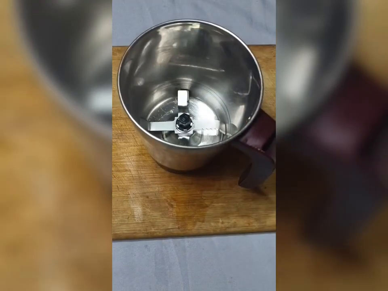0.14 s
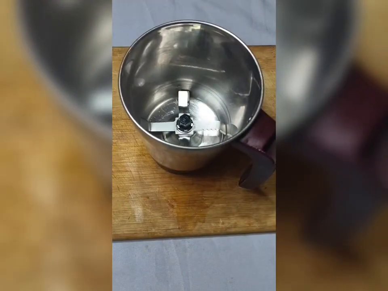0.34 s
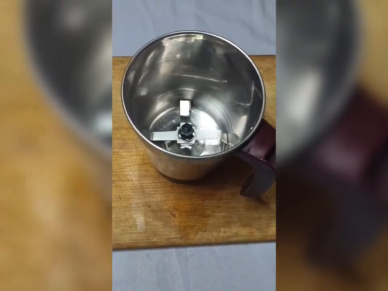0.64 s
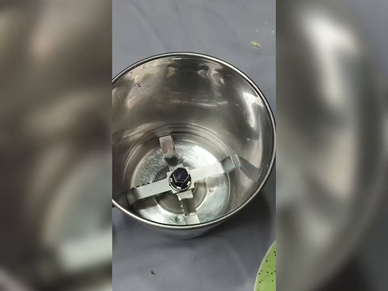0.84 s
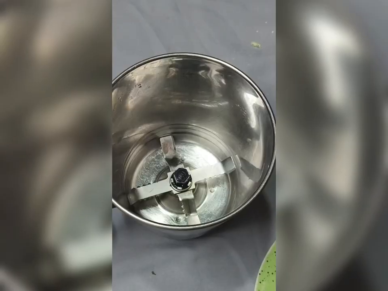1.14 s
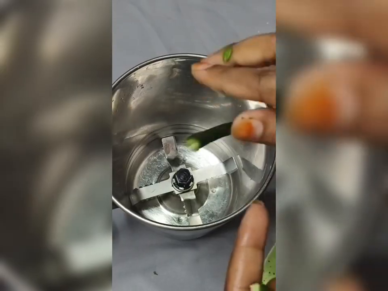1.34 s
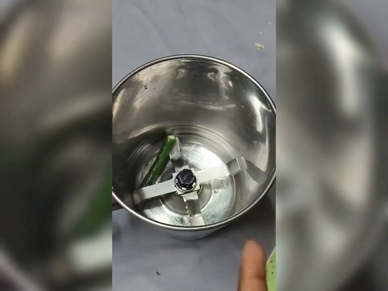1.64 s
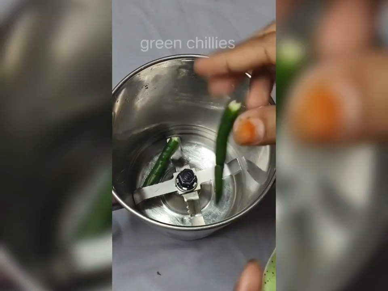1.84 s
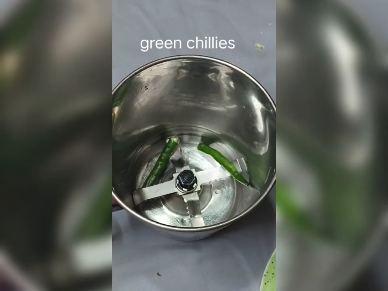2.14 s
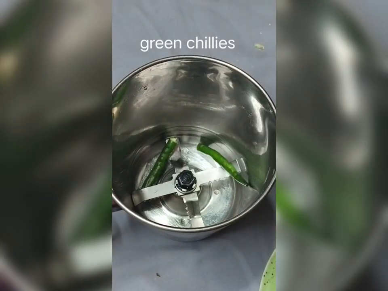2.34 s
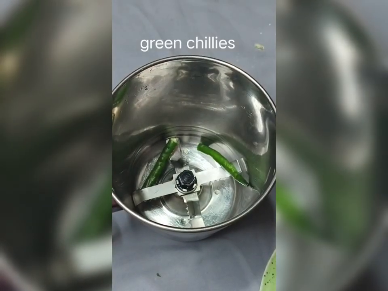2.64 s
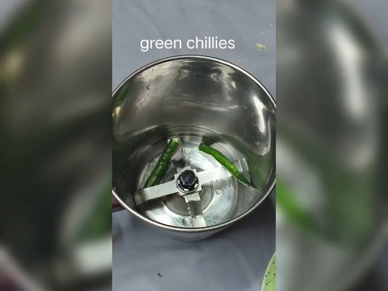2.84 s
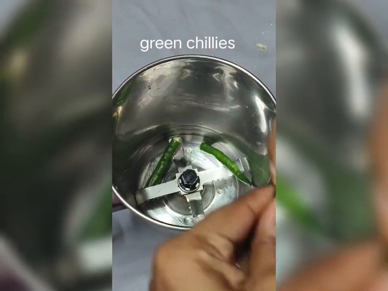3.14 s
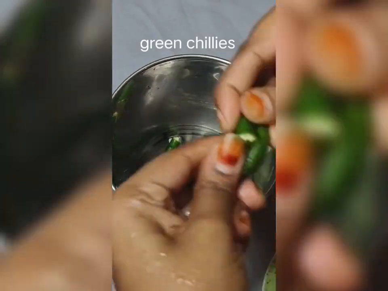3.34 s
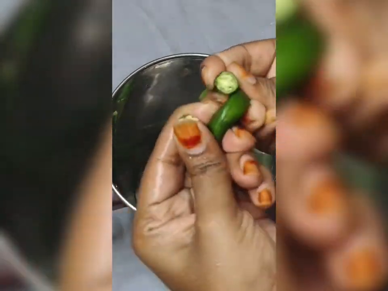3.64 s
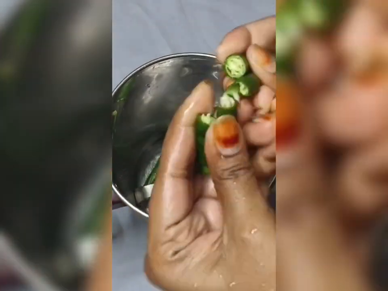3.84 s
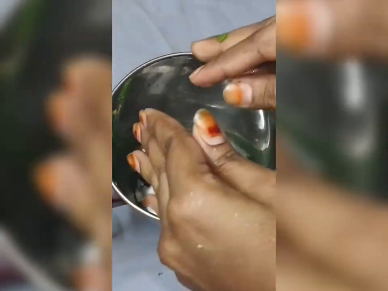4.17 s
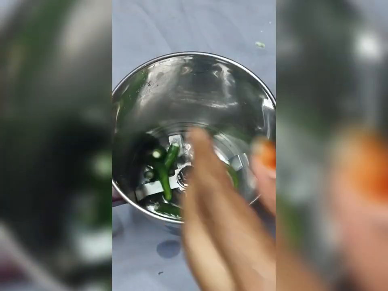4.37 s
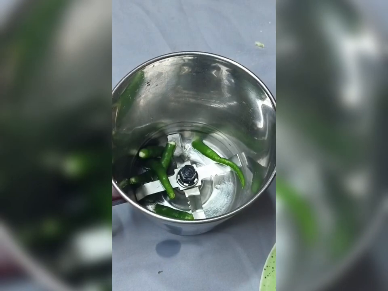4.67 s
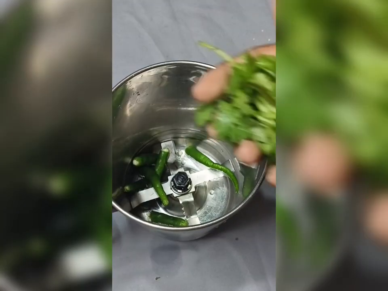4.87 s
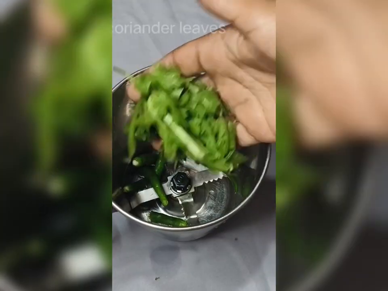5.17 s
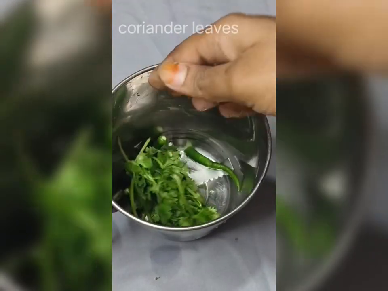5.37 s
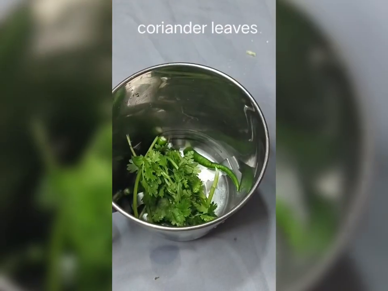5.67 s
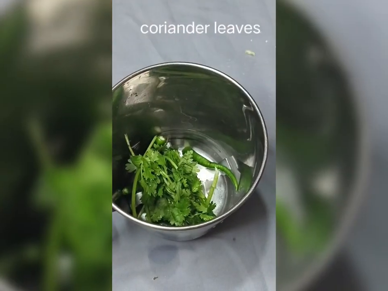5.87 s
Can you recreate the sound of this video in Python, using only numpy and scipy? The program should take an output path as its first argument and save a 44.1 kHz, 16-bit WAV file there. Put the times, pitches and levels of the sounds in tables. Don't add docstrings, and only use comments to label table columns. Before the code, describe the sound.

A metal jar knocks onto a wooden board and rocks, then chillies clatter into it, crack sharply when snapped, and leaves drop softly over faint hiss.

```python
import sys
import numpy as np
from scipy import signal
from scipy.fft import rfft, irfft, next_fast_len
from scipy.io import wavfile
from scipy.ndimage import uniform_filter1d, map_coordinates

SR = 44100
rng = np.random.default_rng(int(sys.argv[2]) if len(sys.argv) > 2 else 0)


def inscribe(sig):
    pcm = np.round(np.clip(np.atleast_2d(sig).T, -1, 1) * 32767)
    wavfile.write(sys.argv[1], SR, pcm.astype(np.int16))


def makeup_ratio(level_db):
    decades = np.asarray(level_db, float) / 20
    return 10 ** decades


N = 264801

# (start [s], end [s], fade-in [s])
SHOTS = [
    (-1, .949, .002),
    (.991, 4.812, .007),
    (5.03, 7, .015),
]


def unit(x):
    return x / np.sqrt(np.mean(x ** 2) + 1e-20)


def along(f, v, hz):
    return np.interp(np.log(hz + 1), np.log(np.asarray(f) + 1), v)


def power_sum(*levels_db):
    return np.sqrt(sum(makeup_ratio(db) ** 2 for db in levels_db))


def wobble(rate_hz):
    knots = rng.standard_normal(int(N * rate_hz / SR) + 4)
    return map_coordinates(knots, [np.arange(N) * rate_hz / SR])


def filtered(x, response):
    m = next_fast_len(x.shape[-1] + 8192)
    return irfft(rfft(x, m) * response(np.fft.rfftfreq(m, 1 / SR)), m)[..., :x.shape[-1]]


def add(track, s, x):
    at = round(s * SR)
    x = x[..., max(-at, 0):N - at]
    track[:, max(at, 0):max(at, 0) + x.shape[-1]] += x


def rush(spectrum, patchy_db):
    z = signal.stft(rng.standard_normal((2, N)), nperseg=512)[2]
    field = uniform_filter1d(rng.standard_normal(z.shape[1:]), size=5, axis=0)
    field = uniform_filter1d(field, size=10, axis=1)
    pair = signal.istft(z * makeup_ratio(patchy_db * unit(field)), nperseg=512)[1][:, :N]
    return unit(filtered(pair, lambda hz: makeup_ratio(along(*np.transpose(spectrum), hz))))


def ring(modes, push, spread_db):
    t = np.arange(SR // 3) / SR
    body = 0
    for hz, db, t60 in modes:
        strength_db = db + spread_db * rng.standard_normal()
        body = body + makeup_ratio(strength_db - 60 * t / t60) * np.sin(2 * np.pi * hz * t)
    out = signal.fftconvolve(push, body[None], axes=1)
    return out / np.abs(out[0]).max()


def drops():
    # (frequency [Hz], level [dB], t60 [s])
    board_modes = [(146, -13, 0.49), (214, 1, 0.079), (253, -10.5, 0.053), (286.8, -10, 0.16),
                   (322, -9.5, 0.1), (430.3, -10.5, 0.11), (474.4, -10.5, 0.17)]
    jar_modes = [(537, -16, 0.033), (621.5, 3.5, 0.22), (678.4, 14, 0.064), (800, -6.5, 0.05),
                 (933, -6, 0.08), (1095, 10.5, 0.026), (1230, -2, 0.051), (1380, -19.5, 0.065),
                 (1450, -10, .1), (1760, -5.5, 0.058), (1900, 3.5, 0.026), (2056, -1.5, 0.037),
                 (2440, -11, 0.03), (2646, -3, 0.029), (2970, -30, 0.081), (3284, -14.5, 0.054),
                 (3740, -16, 0.027), (4690, -15.5, 0.041)]
    # (time [s], board peak [dB], wall peak [dB], blade peak [dB], contact [s])
    landing = [
        (-.02, -18, -30.5, -67, 0.019),
        (.076, -30, -33.5, -70, 0.0029),
    ]
    falls = [(1.7085, -28.5, -31, -19, 0.0041), (1.726, -30, -26, -25, 0.0044),
             (1.754, -45, -63, -34, 0.012), (1.788, -58, -52, -37, 0.008), (1.874, -30, -41, -37, 0.0092),
             (1.92, -56, -40.5, -39, 0.0062), (1.977, -92, -56, -40.5, 0.002),
             (2.012, -65, -44.5, -41, 0.0046), (2.223, -41, -40, -30.5, 0.0021),
             (2.288, -40, -42.5, -42, 0.0048), (2.328, -55, -62, -39, 0.0056),
             (2.389, -63, -48.5, -42.5, 0.01), (4.4656, -26, -31.5, -26.5, 0.0063),
             (4.486, -54.5, -23.5, -30, 0.0054), (4.501, -22.5, -29.5, -24.5, 0.0057),
             (4.534, -46, -35, -38, 0.0058), (4.574, -56, -46.5, -41, 0.0084),
             (4.634, -34, -44, -37.5, 0.0037), (4.663, -40, -67, -54, 0.0073),
             (5.544, -44, -47, -40.5, 0.0027), (5.744, -41, -44.5, -56, 0.0034)]
    wall = [m for m in jar_modes if m[0] < 1300]
    blades = [m for m in jar_modes if m[0] > 1300]
    out, t = np.zeros((2, N)), np.arange(SR // 10) / SR
    for s, board_db, wall_db, blade_db, contact_s in landing + falls:
        rattle = rng.standard_normal((2, len(t))) * makeup_ratio(2.1 * rng.standard_normal(len(t)))
        push = rattle * t * np.exp(-t / contact_s)
        push = push / np.abs(push).max()
        slap = filtered(push, lambda f: 1 / (1 + 1j * f / 3500) ** 2)
        add(out, s, makeup_ratio(board_db) * ring(board_modes, push * [[1], [.3]], spread_db=2))
        add(out, s, makeup_ratio(wall_db) * ring(wall, push, spread_db=0.5))
        add(out, s, makeup_ratio(blade_db - 6) * ring(blades, push, spread_db=2))
        add(out, s, makeup_ratio(blade_db + 3.5) * slap)
    return filtered(out, lambda f: (1j * f / (110 + 1j * f)) ** 3)


def rocks():
    # (time [s], peak [dB], frequency [Hz], swell [s], t60 [s])
    swings = [
        (.0009, -14, 254, .0006, 0.022),
        (0.236, -24.5, 229, 0.005, 0.029),
        (0.262, -23.5, 215.3, 0.014, 0.056),
        (0.317, -38, 215.7, 0.0079, 0.067),
        (0.358, -56, 227, 0.0069, 0.034),
        (0.4, -57, 218, 0.009, 0.062),
    ]
    pings = [(.082, -31.5, 810, .002, 0.023), (0.195, -58, 1930, .004, 0.075),
             (.237, -32, 700, 0.0008, 0.014), (.461, -36, 616, 0.00057, 0.0093),
             (0.912, -67.5, 1740, 0.0067, 0.09), (1.523, -39.5, 638, .002, 0.027),
             (1.845, -46, 1620, 0.0028, 0.03), (1.865, -49, 215, .004, 0.036),
             (1.882, -30.5, 1970, 0.003, 0.021), (1.894, -35, 1558, 0.0022, 0.039),
             (2.166, -44.5, 1588, 0.0047, 0.3), (2.224, -33.5, 1028, 0.0018, 0.051),
             (2.225, -43, 1810, 0.0018, 0.049), (3.309, -48, 72.4, 0.012, 0.16),
             (4.474, -42, 2970, .002, 0.082), (4.504, -30, 2056, .003, 0.07),
             (4.516, -40.5, 2646, 0.0045, 0.18), (4.579, -51.5, 3284, .003, 0.082),
             (5.04, -63, 589, 0.022, .3), (5.225, -52, 214.4, 0.017, 0.56),
             (1.715, -37, 2630, 0.0016, 0.03), (1.732, -33, 1845, .002, .02),
               (1.739, -35, 1725, .003, .04), (1.733, -30.5, 664, .004, .08),
               (1.758, -42, 1900, .003, 0.035), (1.771, -43, 1530, .003, 0.044),
               (1.784, -47, 1700, .003, 0.035), (1.794, -39, 1680, .002, .03),
               (1.803, -48, 1810, .003, 0.036), (1.889, -30, 1780, .002, 0.022),
               (1.915, -46, 1720, 0.0065, .1), (1.98, -47, 622, .008, 0.09),
               (2.225, -42, 2780, 0.0022, .05), (2.228, -44, 890, .002, .06),
               (2.29, -43.5, 224, .006, 0.085), (2.295, -46.5, 317, .004, 0.072),
               (2.372, -53.5, 483, 0.01, 0.14), (4.49, -27.5, 665, .006, 0.097),
               (4.505, -44, 4800, .003, .06), (4.478, -36.5, 1554, 0.0032, 0.067),
               (4.58, -47.5, 1723, 0.0036, .08), (4.634, -50.5, 1763, 0.0036, 0.072),
               (4.65, -47, 1590, .003, .04), (4.634, -56, 3275, 0.0035, 0.11),
               (4.664, -38.5, 262, .003, .04), (4.503, -26, 215, .006, .06), (1.737, -31, 230, .004, .05),
               (1.76, -36, 250, .003, .04), (1.713, -36, 1150, .002, .04), (2.29, -44, 655, .006, .2),
               (.245, -40, 480, .005, .1), (.27, -42, 620, .006, .1)]
    chimes = [(-.01, -49.5, 1850, 0.003, 0.48), (-.01, -57, 2670, 0.0014, 0.36),
              (-.01, -68, 3160, 0.0018, 0.42), (-.01, -69, 4620, 0.0018, 0.31),
              (-.01, -33, 692, 0.0089, .25), (-.01, -34, 327.4, 0.0067, 0.21),
              (-.01, -39.5, 1079, 0.0056, 0.22), (.196, -65, 4500, .002, 0.074),
              (.196, -69, 7860, .002, .06), (.238, -60.5, 1980, .003, .05), (-.01, -63, 7360, .002, 0.13),
              (0.194, -61, 3220, 0.0011, 0.13), (.36, -61.5, 208, 0.015, 1.9)]
    out, flutter_db, waver_rad = np.zeros((2, N)), 2.5 * wobble(80), .7 * wobble(90)
    for k, (s, db, hz, swell_s, t60) in enumerate(swings + pings + chimes):
        t = np.arange(int(SR * min(t60 + 4 * swell_s, .62))) / SR
        own = slice(k * 3000, k * 3000 + len(t))
        loose = min(hz / 1000, 1) * (k >= len(swings))
        shape = (1 - np.exp(-t / swell_s)) ** 2 * makeup_ratio(-60 * t / t60)
        shape = shape / shape.max() * makeup_ratio(loose * flutter_db[own])
        tone = np.sin(2 * np.pi * hz * t + loose * waver_rad[own])
        add(out, s - .004, makeup_ratio(db) * shape * tone * [[1], [.2]])
    return out


def rolling():
    # (time [s], wall level [dB], blade level [dB])
    rubs = [(1.724, -45, -49), (1.888, -45.5, -62), (1.974, -45, -63), (2.08, -59, -50), (2.18, -54, -49),
            (2.3, -43.5, -50), (2.42, -52, -44.5)]
    rise_db_per_s, fall_db_per_s = 455, 197
    t = np.arange(N) / SR

    def fit_db(s):
        return np.minimum(rise_db_per_s * (t - s), fall_db_per_s * (s - t))

    def mode(hz, width_hz):
        noise = rng.standard_normal((2, N))
        return unit(filtered(noise, lambda f: (f * width_hz / (hz * hz - f * f + 1j * f * width_hz)) ** 2))

    wall = power_sum(*[wall_db + fit_db(s) for s, wall_db, _ in rubs])
    blade = power_sum(*[blade_db + fit_db(s) for s, _, blade_db in rubs])
    wall_hum = wall * makeup_ratio(-4.5 + 1.2 * wobble(29.87)) * mode(648, 43)
    blade_hum = blade * makeup_ratio(-5.0 + 2.1 * wobble(30.3)) * mode(1587, 74)
    return wall_hum + blade_hum


def snap():
    # (time [s], peak [dB])
    cracks = [
        (3.4833, -6.5),
        (3.484, -17.5),
        (3.4898, -15.5),
        (3.4946, -17),
        (3.503, -28.5),
        (3.512, -30),
        (3.527, -34.5),
        (3.5345, -34.5),
    ]
    # (frequency [Hz], width [Hz], level [dB])
    pod_modes = [(700, 200, -13), (1450, 490, -13), (2630, 300, -5), (4400, 560, -10.5), (6300, 1080, -14),
                 (9700, 2100, -14.5), (12100, 1800, -17.5), (15000, 2300, -22.5)]

    def pod(f):
        return sum((-1) ** k * makeup_ratio(db) * 1j * f * width / (hz * hz - f * f + 1j * f * width)
                   for k, (hz, width, db) in enumerate(pod_modes))

    out, t = np.zeros((2, N)), np.arange(SR // 8) / SR
    for s, db in cracks:
        noise = rng.standard_normal((2, len(t))) * [[1], [.6]]
        crack_and_crackle = makeup_ratio(-60 * t / 0.011) + 0.098 * makeup_ratio(-60 * t / 0.18)
        crack = filtered(noise * crack_and_crackle, pod)
        add(out, s, makeup_ratio(db) * crack / np.abs(crack[0]).max())
    pop = (1 - np.exp(-t / .0007)) * makeup_ratio(-60 * t / .013) * np.sin(2 * np.pi * 2750 * t)
    add(out, 3.4837, makeup_ratio(-2.5) * pop * [[1], [-.3]])
    return out


def pops():
    # (time [s], peak [dB], frequency [Hz], swell [s], t60 [s])
    bursts = [(1.0885, -34, 7800, .003, 0.019), (1.0963, -28, 7800, .0001, 0.012),
              (3.4835, -17, 1450, .0004, .011), (3.4834, -12, 4400, .0002, .007),
              (3.4845, -28, 630, .001, .08), (3.4838, -20, 1950, .0003, .008),
              (3.4847, -16.5, 6820, .0002, 0.0094), (3.4891, -18, 2740, .0004, 0.022),
              (3.5005, -32.5, 2600, .001, 0.024), (3.511, -28.5, 2600, .0015, .035),
              (3.525, -32.5, 2600, .001, .025), (3.535, -34.5, 2556, .002, .06),
              (4.007, -41, 5930, .0004, .012), (4.019, -36, 5970, .004, 0.052),
              (4.0232, -34, 7900, .0005, 0.013), (4.0227, -35.5, 4000, .0006, 0.018)]
    out, t = np.zeros((2, N)), np.arange(SR // 10) / SR
    rough_db = 3 * wobble(500)
    for s, db, hz, swell_s, t60 in bursts:
        shape = (1 - np.exp(-t / swell_s)) * makeup_ratio(-60 * t / t60)
        level = makeup_ratio(db + rough_db[round(s * SR):][:len(t)])
        add(out, s, level * shape / shape.max() * np.sin(2 * np.pi * hz * t) * [[1], [.3]])
    return out


def tears():
    # (time [s], peak [dB], centre [Hz], swell [s], t60 [s])
    rips = [(0.192, -57.5, 4500, 0.0018, 0.059), (0.232, -56.5, 4520, .002, .05),
            (1.076, -37.5, 7010, 0.0027, 0.039), (1.086, -28.5, 7050, 0.006, 0.076),
            (1.0963, -28.5, 7000, .0002, 0.11), (1.414, -40, 4972, 0.0012, 0.025),
            (1.711, -43, 4500, .002, .06), (2.2242, -33.5, 3140, .0004, 0.033),
            (3.4753, -29, 3194, 0.0066, 0.057), (3.815, -47, 3000, 0.0024, .03),
            (4.006, -35.5, 5900, 0.012, .07), (4.021, -32.5, 1450, .002, 0.028),
            (4.022, -24, 4900, 0.0015, 0.045), (4.031, -30.5, 7100, 0.0014, 0.058),
            (4.47, -38.5, 3000, 0.0032, 0.11), (4.5, -39.5, 3516, 0.0036, 0.099),
            (5.545, -40.5, 2505, 0.002, .04), (3.5, -32.5, 7000, .008, .2), (1.712, -36, 3000, .004, .12),
            (1.745, -41.5, 2200, .01, .2), (4.515, -39.5, 2000, .008, .22), (4.575, -46, 2200, .005, .15),
            (4.63, -44.5, 2000, .006, .16), (2.232, -41.5, 1800, .004, .1)]
    out, t = np.zeros((2, N)), np.arange(SR // 8) / SR
    for s, db, hz, swell_s, t60 in rips:
        spikes = rng.standard_normal((2, len(t))) * makeup_ratio(1.8 * rng.standard_normal(len(t)))
        shape = (1 - np.exp(-t / swell_s)) * makeup_ratio(-60 * t / t60)
        burst = filtered(spikes * shape, lambda f: 1j * f * hz / (hz * hz - f * f + .7j * f * hz) + 0.22)
        add(out, s, makeup_ratio(db) * burst / np.abs(burst[0]).max())
    return out


def afterglow():
    # (landing level [dB], t60 [s], lingering level [dB], its t60 [s])
    fades = [
        (-56, 0.31, -64, 3.35),
        (-31, 0.6, -60, 2.34),
        (-41.5, 0.074, -67, 3.86),
        (-69, 0.12, -76.5, 8.5),
    ]
    # (time [s], top level [dB], fizz level [dB])
    touches = [(.45, -75, -88), (.93, -79, -92)]
    # (frequency [Hz], level [dB per Hz])
    boom_spectrum = [(25, -30), (60, -11), (110, -3.5), (160, 3.5), (210, -3.5), (280, -5.5), (420, -7.5),
                     (520, -56.5)]
    body_spectrum = [(350, -28.5), (450, 10.5), (680, 3.5), (900, 3.5), (1150, -1.5), (1350, -24),
                     (1700, -45)]
    top_spectrum = [(1200, -9), (1400, -6), (1900, -2.5), (2300, -9), (2700, -10.5), (3300, -15.5),
                    (4000, -17), (5000, -37.5)]
    fizz_spectrum = [(3000, -35.5), (4000, 0.5), (7000, -2), (9900, -5.5), (11500, -11.5), (13000, -6),
                     (15700, -11)]
    t = np.arange(N) / SR
    boom, body, top, fizz = [power_sum(db - 60 * t / t60, late_db - 60 * t / late_t60)
                             for db, t60, late_db, late_t60 in fades]
    since_s = np.maximum(t - .23, 0)
    boom = boom + (1 - np.exp(-since_s / .04)) * makeup_ratio(-40 - 60 * since_s / .6)
    for s, top_db, fizz_db in touches:
        touch = np.exp(-((t - s) / 0.04) ** 2)
        top = top + makeup_ratio(top_db) * touch
        fizz = fizz + makeup_ratio(fizz_db) * touch
    low = boom * rush(boom_spectrum, patchy_db=2.5) + body * rush(body_spectrum, patchy_db=0.5)
    high = top * rush(top_spectrum, patchy_db=-1.5) + fizz * rush(fizz_spectrum, patchy_db=2.0)
    return (low + high) * (t < SHOTS[0][1])


def squeal():
    # (time [s], length [s], frequency [Hz], level [dB])
    squeaks = [(5.8, .075, 860, -58), (5.865, .105, 1025, -49), (5.968, .06, 1295, -49)]
    climb_hz_per_s, edge_s = 500, .012
    out, rough = np.zeros((2, N)), wobble(60)
    for s, length_s, hz, db in squeaks:
        t = np.arange(int(length_s * SR)) / SR
        shape = np.clip(np.minimum(t, length_s - t) / edge_s, 0, 1) * makeup_ratio(db + 1.5 * rough[-len(t):])
        pitch_hz = (hz + climb_hz_per_s * t) * (1 + .022 * rough[:len(t)])
        phase = 2 * np.pi * np.cumsum(pitch_hz) / SR
        add(out, s, shape * np.sin(phase + np.array([[0], [1.5]])))
    return out


def air():
    # (frequency [Hz], level [dB per Hz])
    rumble_spectrum = [(12, -36), (20, -25), (49, -2.5), (81, -2), (102, 0.5), (135, -9.5), (170, -12),
                       (220, -49.5), (370, -120)]
    hum_spectrum = [(130, -35), (170, 0), (210, 3.5), (260, -6), (340, -2), (430, -4.5), (520, -29)]
    bustle_spectrum = [(400, -21.5), (480, -4), (640, -3.5), (800, -5), (1050, -3.5), (1250, -5),
                       (1500, -0.5), (1750, -7), (2000, -13), (2300, -48.5)]
    hiss_spectrum = [(1500, -41.5), (1900, -13), (2150, -5.5), (2500, -0.5), (2830, 1), (3350, -4),
                     (3760, -4.5), (4850, -2), (6440, -2.5), (10200, -4), (11100, -5.5), (14900, -3.5),
                     (15750, -4.5)]
    # (rumble [dB], hum [dB], bustle [dB], hiss [dB])
    rest_db = (-61, -64.5, -56.5, -49)
    # (time [s], gain [dB])
    gain_points = [(.995, -3.5), (1.15, 2), (1.25, -2.5), (1.4, -0.5), (1.7, -0.5), (1.84, -4), (2.0, 0.5),
                   (2.3, 1), (3.45, 0.55), (3.62, -2), (3.8, 1), (4.3, -0.5), (4.81, 0), (5.035, -15),
                   (5.12, -7.5), (5.25, -4.5), (5.5, -1.5), (6.0, -1.5)]
    # (time [s], half-length [s], rumble lift [dB], hum lift [dB], bustle lift [dB])
    stirs = [(1.757, 0.29, -3, 2, 5.5), (2.247, 0.33, 0, -2, 3.5), (2.745, 0.19, 3, 3, -0.5),
             (3.318, 0.099, 2, 0.5, -0.5), (3.628, 0.078, -2, 1, -0.5), (3.9, 0.087, -0.5, 1, 0.5),
             (4.25, 0.26, -3.5, 0, -1), (4.569, .1, -23, 3, 6), (5.275, 0.13, 3.5, 10.5, 0.5),
             (5.547, 0.099, 6, 7, 3.5), (5.776, 0.059, 8.5, 8.5, -2), (5.906, 0.1, 10, 7.5, 4)]
    t = np.arange(N) / SR
    gain_db = np.interp(t, *np.transpose(gain_points))
    lifts_db = sum(np.outer([*lift_db, 0], np.exp(-((t - s) / half_s) ** 2)) for s, half_s, *lift_db in stirs)
    gain_share = np.array([[0.52], [0.52], [0.52], [1]])
    levels_db = np.array(rest_db)[:, None] + gain_db * gain_share + lifts_db
    rumble_db, hum_db, bustle_db, hiss_db = levels_db
    rumble = makeup_ratio(rumble_db + 1.3 * wobble(6.5)) * rush(rumble_spectrum, patchy_db=0.0)
    hum = makeup_ratio(hum_db + .8 * wobble(12)) * rush(hum_spectrum, patchy_db=.7)
    bustle = makeup_ratio(bustle_db - 2.5 + .8 * wobble(11)) * rush(bustle_spectrum, patchy_db=1.3)
    hiss = makeup_ratio(hiss_db + 0.28 * wobble(6.1)) * rush(hiss_spectrum, patchy_db=1.46)
    return np.where(t > SHOTS[0][1], rumble + hum + bustle + hiss, makeup_ratio(-10.5) * rumble)


def kitchen(x):
    # (frequency [Hz], t60 [s])
    decay = [(200, 0.38), (700, 0.32), (2000, 0.21), (6000, 0.042), (15000, 0.28)]
    hz, t, z = signal.stft(rng.standard_normal((2, SR // 2)), SR, nperseg=256)
    t60 = along(*np.transpose(decay), hz)[:, None]
    tail = signal.istft(z * makeup_ratio(-60 * t / t60), SR, nperseg=256)[1]
    late = np.pad(x, (200, 0))[None]
    return signal.fftconvolve(late, tail / np.linalg.norm(tail[0]), axes=1)[:, :N]


def ports(pair, nearness):
    # (frequency [Hz], likeness [0-1], left lead [rad], left-right [dB])
    port_rows = [(150, 0.94, -2.5, 0.5), (302, 0.84, -5.5, -1), (446, 0, -0.76, 0), (642, 0.34, 2.5, -5.5),
                 (876, 0.42, 3.5, -4.5), (1390, 0.8, 1.5, -4.5), (1960, 0.2, 2, -2), (2670, 0.03, 2, -1),
                 (3280, 1, 1, -1), (4000, 0.78, 2.5, 6.5), (4900, 1, 1.5, 4), (7550, .1, 1.5, 3),
                 (8250, 0.2, 1, -1), (10900, 0.3, 2, 3), (13700, 0.2, 5, 2)]
    f, alike, lead_rad, balance_db = np.transpose(port_rows)
    side = np.array([[.5], [-.5]])

    def mix(hz):
        turn = np.arccos(np.clip(along(f, alike + nearness * (1 - alike), hz), 0, 1)) / 2
        return np.array([np.cos(turn), np.sin(turn)])

    def tilt(hz):
        apart = np.clip((hz - 300) / 200, 0, 1)
        return makeup_ratio(side * along(f, balance_db, hz)) * np.exp(1j * side * apart * along(f, lead_rad, hz))

    same, other = filtered(pair, mix)
    return filtered(np.array([same + other, same - other]), tilt)


def scene():
    knocks = drops() + rocks() + rolling()
    cracks = tears() + makeup_ratio(2.0) * snap() + pops()
    room = makeup_ratio(-8.5) * kitchen(knocks[0]) + makeup_ratio(-15) * kitchen(cracks[0])
    far = ports(air() + afterglow() + squeal() + room, nearness=0)
    return far + ports(knocks, nearness=0.44) + ports(cracks, nearness=0.15)


def top_cut(x):
    return signal.sosfilt(signal.butter(12, 16520, fs=SR, output="sos"), x)


def record(dry):
    t = np.arange(N) / SR
    gate = 0
    for start_s, end_s, fade_s in SHOTS:
        gate = gate + np.clip((t - start_s) / fade_s, 0, 1) * np.clip((end_s - t) / .004, 0, 1)
    mix = filtered(dry, lambda hz: hz < 15640) * gate
    return top_cut(mix)


dry = scene()
out = record(dry)
inscribe(out)
```